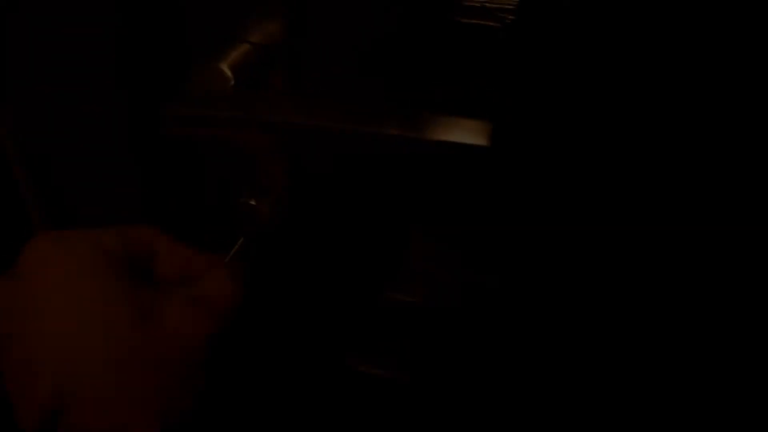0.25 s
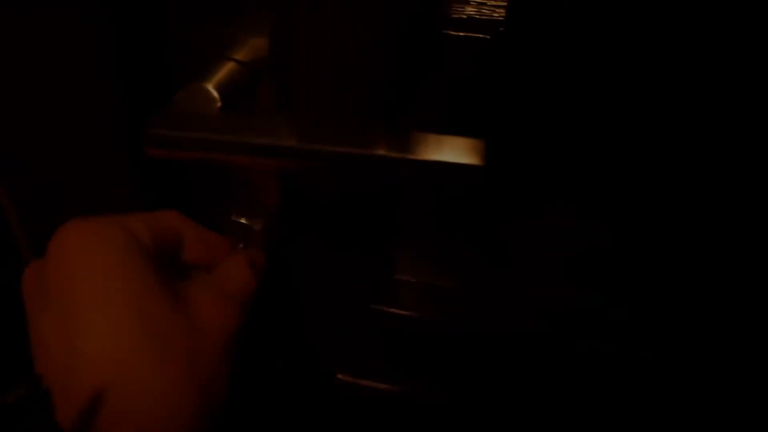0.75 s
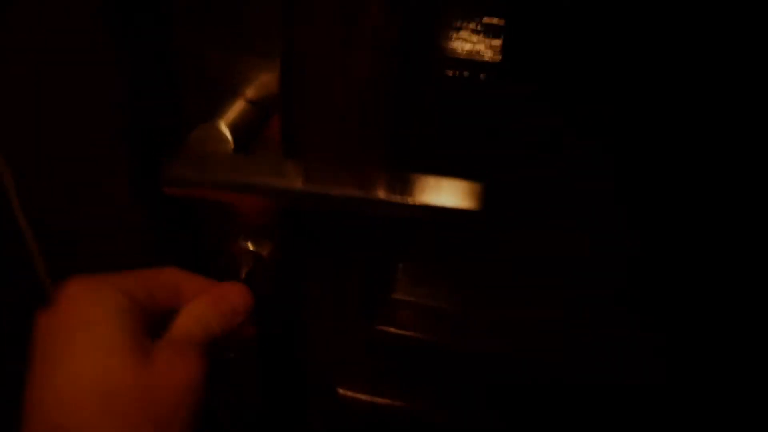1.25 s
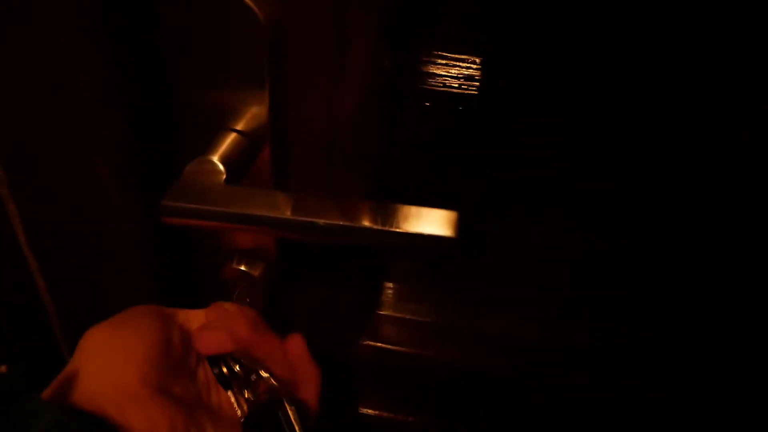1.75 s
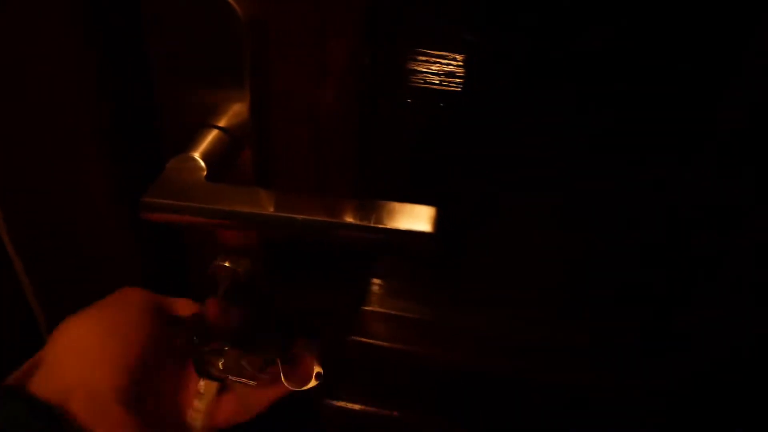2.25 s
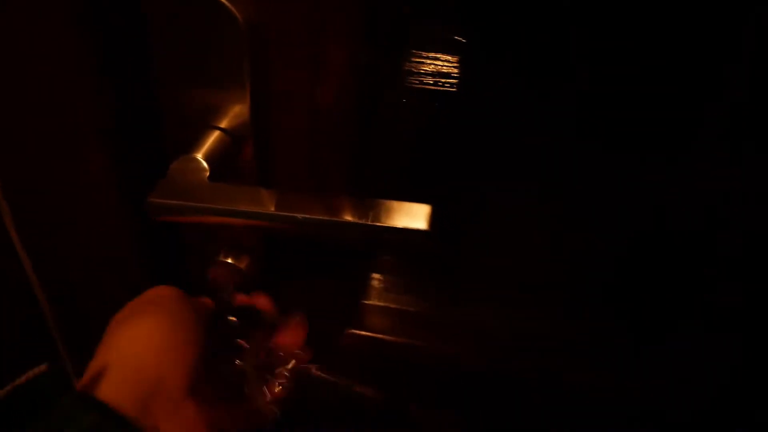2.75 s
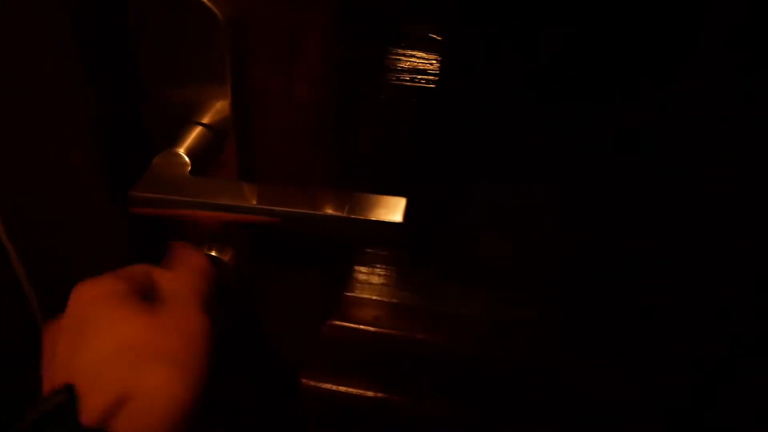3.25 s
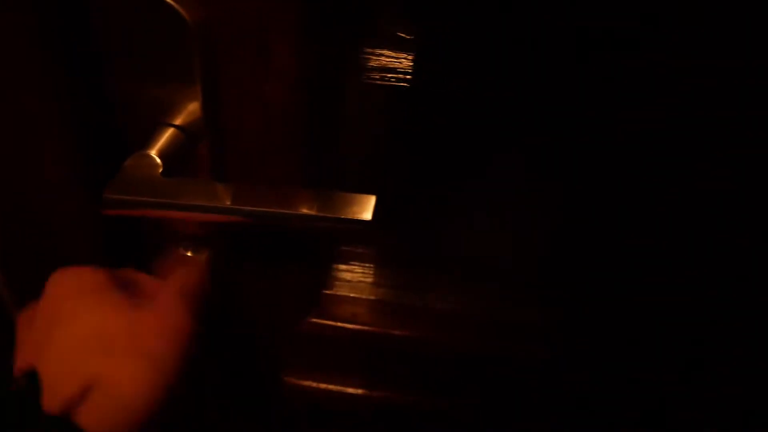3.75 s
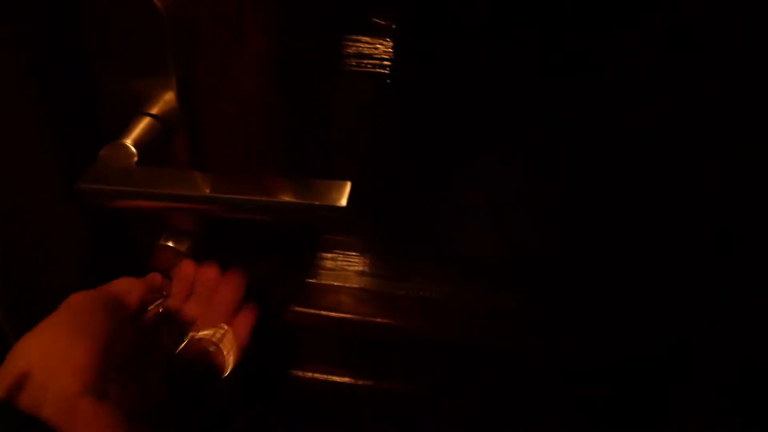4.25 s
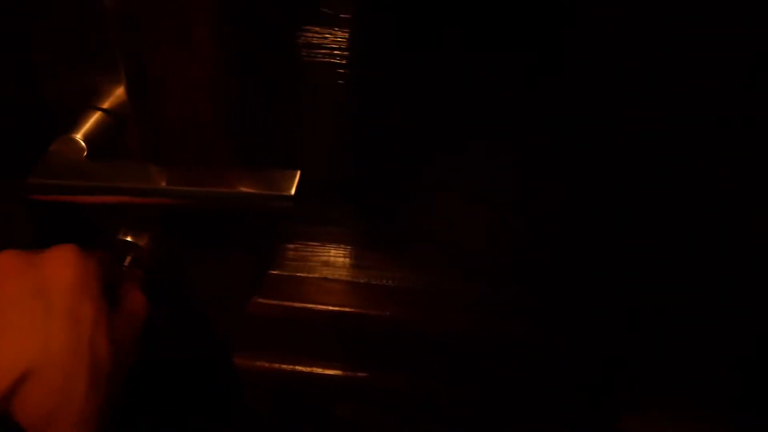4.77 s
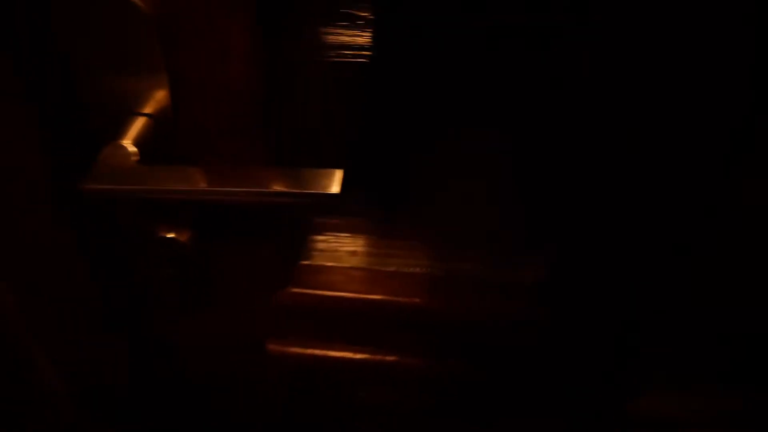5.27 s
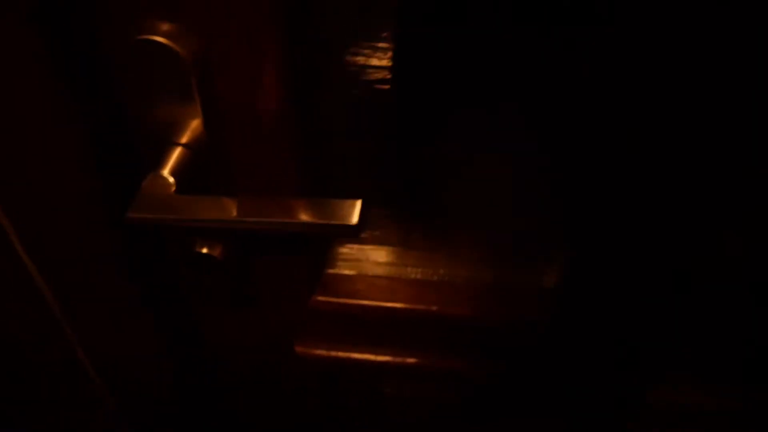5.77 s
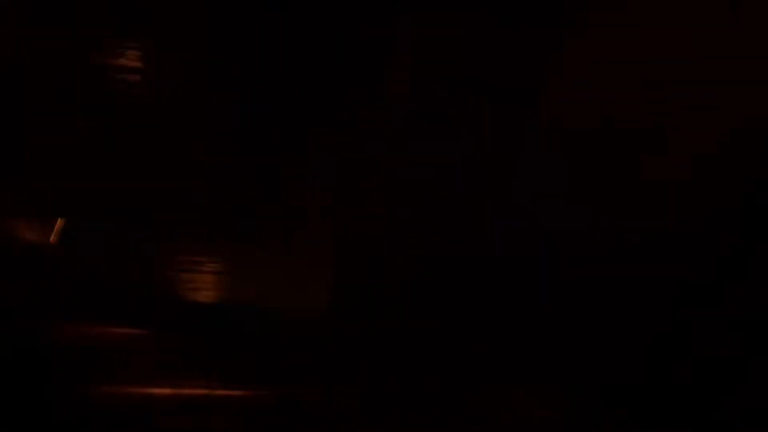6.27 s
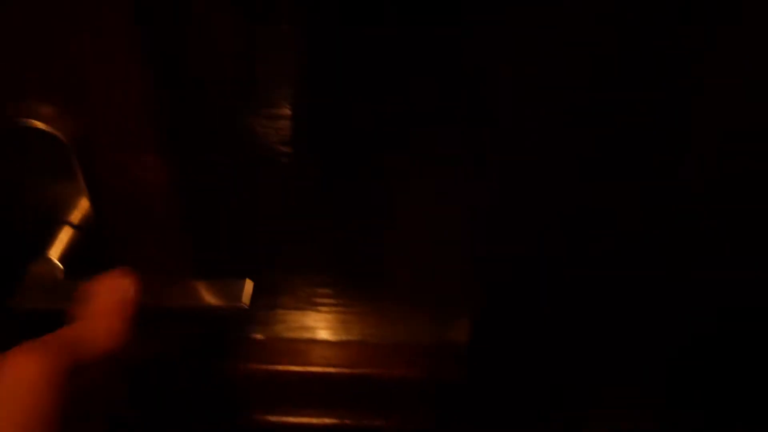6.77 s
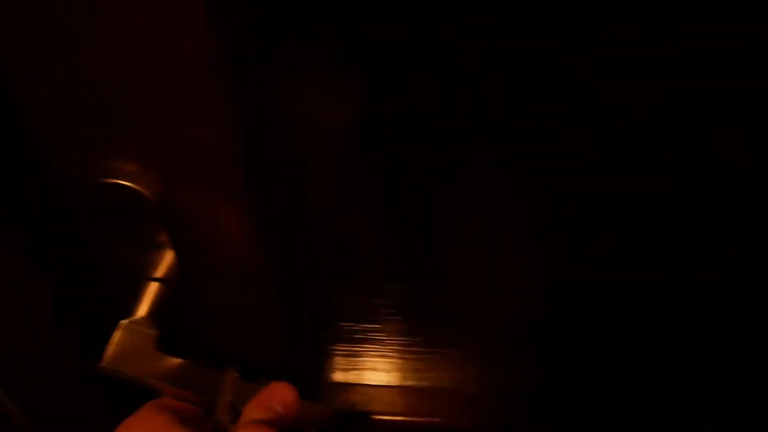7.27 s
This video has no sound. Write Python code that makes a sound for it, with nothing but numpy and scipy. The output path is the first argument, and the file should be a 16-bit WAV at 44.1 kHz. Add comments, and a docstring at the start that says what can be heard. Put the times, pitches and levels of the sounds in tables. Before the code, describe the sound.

Close, dry metallic clicks and scrapes of a key worked in a lock, with jingling keys, bolt knocks and a final lever handle clack.

```python
"""Pins and latch click, a key scrapes in a door lock, loose keys chink and the bolt knocks the wooden door.
Heard close by in a small hallway: a hand works a key on a bunch; near the end keys tap the lever handle.
Clicks and scrape are noise through resonances of the lock; keys, lever, door and case are decaying sines.
Clicks, chinks, taps and knocks also feed sparse hallway reflections; quiet air noise lies beneath."""
import sys
import numpy as np
from scipy import signal
from scipy.fft import rfft, irfft
from scipy.io import wavfile
from scipy.ndimage import uniform_filter1d

SR = 44100
rng = np.random.default_rng(int(sys.argv[2]) if len(sys.argv) > 2 else 0)


def transcribe(signal):
    """Save signal, clipped to [-1, 1], as a 16-bit WAV file at the path in sys.argv[1]."""
    frames = np.atleast_2d(signal).T
    limited = np.clip(frames, -1, 1)
    pcm = np.round(limited * 32767).astype(np.int16)
    wavfile.write(sys.argv[1], SR, pcm)


N = 331632

# Spectrum of the hallway air. Each row: frequency in Hz, relative level in dB.
AIR_SPECTRUM = [(15, -70), (25, 18.5), (848, 10), (2920, 3.5), (3830, -17), (10100, -30), (15500, -12)]
AIR_RMS_DB = -50.5
# Decay of the hallway reflections. Each row: frequency in Hz, t60 in seconds.
HALL_DECAY = [(150, 0.47), (2000, 0.059), (12000, 0.04)]

# Modes of the door panel. Each row: frequency in Hz, relative level in dB, t60 in seconds.
DOOR_MODES = [(105.5, -7.5, 0.08), (136.6, -4, 0.34), (174, -1.5, 0.17), (256.5, 0, 0.24), (328, 7, 0.12),
              (412, 6, 0.11), (504, 1.5, 0.075), (673, 3.5, 0.11), (815, 13.5, 0.047), (997, 14.5, 0.04),
              (1167, 13.5, 0.024)]
# Plates of the lock case. Each row: frequency in Hz, relative level in dB, t60 in seconds.
CASE_MODES = [(1008, 3, 0.048), (1120, -8.5, 0.081), (1714, 0.5, 0.052), (2090, 11, 0.0072),
              (2300, -12, 0.011)]
# Blows that reach the door panel. Each row: start in seconds, peak in dB, pitch region struck in Hz.
DOOR_KNOCKS = [(0.107, -20.5, 910), (0.486, -24.5, 720), (0.971, -31, 940), (1.376, -24, 765),
               (1.662, -20.5, 290), (1.757, -15.5, 590), (1.969, -26.5, 373), (2.245, -19.5, 680),
               (2.653, -7, 547), (2.792, -22, 810), (2.844, -20.5, 645), (2.987, -14, 577),
               (3.29, -15, 646), (3.48, -27, 880), (3.8122, -7.5, 597), (4.048, -21, 660),
               (5.847, -31, 570), (6.71, -28, 267), (7.066, -24, 475), (7.146, -13.5, 493)]
# Soft pushes that shake the whole leaf. Each row: start in seconds, peak in dB, pitch region struck in Hz.
LEAF_PUSHES = [(0.004, -29.5, 174), (0.582, -28, 189), (0.69, -31.5, 141), (0.985, -29, 187),
               (1.665, -29.5, 119), (4.863, -28.5, 100), (5.996, -30.5, 195), (6.96, -33.5, 216),
               (7.158, -23.5, 128)]
# Bolt against lock case. Each row: start in seconds, peak in dB, pitch region struck in Hz.
BOLT_CLANKS = [(1.46, -15, 1740), (3.137, -16.5, 1940), (3.29, -4.5, 2070), (4.641, -18.5, 1170),
               (5.699, -23.5, 1240), (6.6845, -13.5, 966)]
MODE_DETUNE = .015  # spread of mode frequency per blow, as a fraction

# Modes of the lever handle. Each row: frequency in Hz, level in dB, t60 in seconds.
LEVER_MODES = [(3500, -19.5, 0.037), (6050, -2, 0.013), (8200, -12, 0.058), (9630, 1.5, 0.027),
               (10740, 8.5, 0.0043), (14400, 8, 0.0063)]
# A ring of keys taps the lever handle. Each row: start in seconds, level in dB.
KEY_TAPS = [(6.927, -8), (7.497, -30)]

# Modes of the short key. Each row: frequency in Hz, relative level in dB.
SHORT_KEY_MODES = [(8110, -16.5), (10140, -2), (13350, -20)]
# Modes of the long key. Each row: frequency in Hz, relative level in dB.
LONG_KEY_MODES = [(8655, -8), (9990, -2), (14730, -23)]
# Modes of the rest of the bunch. Each row: frequency in Hz, relative level in dB.
SMALL_KEY_MODES = [(7120, -16), (9440, -11), (10300, -11)]
# Loose keys striking. Each row: start in seconds, short key level in dB, long key level in dB,
# seconds until a touch damps them.
KEY_CHINKS = [(0.2465, -18, -35, 0.02), (1.075, -34, -18.5, 0.011), (1.282, -13.5, -15.5, 0.0045),
              (1.313, -21, -38, 0.008), (1.341, -30, -27, 0.0082), (2.0646, -14.5, -23, 0.0035),
              (2.336, -4.5, -15, 0.0082), (2.421, -38, -21.5, 0.073), (2.5097, -21, -20, 0.028),
              (2.607, -17, -33, 0.05), (2.756, -36, -28, 0.04), (2.801, -13, -34, 0.032),
              (2.826, -16, -20, 0.0097), (2.915, -30, -7.5, 0.015), (2.932, -28, -13, 0.016),
              (3.725, -21, -43, 0.076), (3.79, -23, -18, 0.025), (3.869, -24, -24, 0.012),
              (4.116, -35, -16.5, 0.016), (4.156, -10, -35, 0.011), (4.177, -22, -19, 0.01),
              (4.1997, -13, -19, 0.005), (4.215, -17, -10, 0.0045), (4.23, -9.5, -16, 0.01),
              (4.5482, -17, -23, 0.0091)]
KEY_T60_S, TOUCH_T60_S = 0.17, 0.01  # the touch adds its decay to that of the key
SWING_START_S, SWING_END_S = 1, 4.35  # while the bunch swings from the lock

# Lower resonances of lock case and handle. Each row: frequency in Hz, width in Hz, relative level in dB.
LOCK_LOW_MODES = [(1890, 640, -12), (2440, 424, -8), (3008, 328, -7.5), (3228, 262, -6.5),
                  (4120, 1260, -17.5)]
# Upper resonances of lock case and handle. Each row: frequency in Hz, width in Hz, relative level in dB.
LOCK_HIGH_MODES = [(5770, 1100, -14), (6480, 2500, 3), (8480, 1100, 0.5), (9780, 1450, 8)]
LOCK_MODE_COUNT = len(LOCK_LOW_MODES) + len(LOCK_HIGH_MODES)

# Spectrum of the push in the door. Each row: frequency in Hz, relative level in dB.
RUMBLE_SPECTRUM = [(24, -53), (40, -21), (129, -0.5), (329, 0.5), (651, 2.5), (1500, -4), (3300, -120)]
# Strokes of metal on metal. Each row: time of full force in seconds, build-up in seconds, hold in seconds,
# scrape level in dB, rumble level in dB.
KEY_STROKES = [(0.0, .01, 0.0052, -26, -40.5), (0.116, 0.045, 0.052, -41, -47.5),
               (1.18, 0.14, 0.0035, -21, -30), (1.478, 0.032, 0.051, -19.5, -27.5),
               (1.921, 0.067, 0.064, -29, -50), (2.21, 0.16, 0.012, -26, -34.5),
               (2.521, 0.056, 0.057, -23.5, -40), (2.872, 0.13, 0.035, -31, -33.5),
               (3.149, 0.043, 0.18, -30.5, -44.5), (3.498, 0.098, 0.036, -29.5, -41),
               (3.853, 0.26, 0.019, -30.5, -40.5), (3.964, 0.029, 0.034, -30, -43),
               (4.078, 0.17, 0.054, -33, -35.5), (4.227, 0.21, 0.011, -29, -44.5),
               (4.874, 0.0031, 0.048, -26, -35.5), (5.301, 0.42, 0.065, -33.5, -45),
               (5.55, 0.026, 0.16, -28.5, -50), (6.489, 0.95, 0.046, -34.5, -47),
               (7.098, 0.01, 0.072, -32, -37.5), (7.51, 0.17, .02, -37, -46)]
# Light contact of hand and key between strokes. Each row: time in seconds, scrape level in dB,
# rumble level in dB.
LIGHT_CONTACT = [(0, -45, -64), (.44, -44.5, -44.5), (.95, -51, -52.5), (1.35, -35, -44.5),
                 (1.8, -43, -42.5), (2.3, -34, -44), (2.465, -38.5, -53.5), (2.6, -30.5, -44),
                 (2.8, -30, -40.5), (3.099, -45, -48.5), (4.1, -39, -92), (4.45, -43, -39),
                 (4.82, -57, -67), (5.0, -48, -51), (5.47, -47, -53.5), (6.1, -40, -52), (6.64, -48, -52),
                 (6.75, -44, -47), (7.05, -48.5, -51), (7.35, -52, -57)]
BUILD_DB, RELEASE_DB_PER_S = 17, 242  # a stroke swells by this much, then lets go at this rate
SCRAPE_LOW_DB = -6  # share of the lower lock modes

# Clear strikes of pins, bolt and handle parts. Each row: start in seconds, peak before panning in dB,
# share of the lower lock modes in dB.
PART_CLICKS = [(0.075, -17, -10), (0.098, -4.5, -5), (0.135, -20, -20), (0.325, -21.5, -2),
               (0.388, -21, -40), (0.435, -16.5, -7.5), (0.4779, -5.5, -2.5), (0.484, -6, -11),
               (0.5354, -12.5, -2), (0.561, -1.5, -10.5), (0.574, -12, -2), (0.631, -14.5, -2),
               (0.6672, -9, -7.5), (0.829, -21.5, -4.5), (0.966, -17.5, -3.5), (1.018, -17, -13),
               (1.129, -9, -3), (1.185, -7, -3), (1.19, -0.5, -10), (1.373, -18.5, -2.5), (1.445, -8, -1.5),
               (1.5371, -1.5, -7), (1.62, -8, -8), (1.6733, -11, -9), (1.759, 0.5, -6), (1.971, -19, -21),
               (2.0648, -11.5, -30), (2.155, -11.5, -7.5), (2.18, -16, -9), (2.2, -13.5, -3),
               (2.216, -27, -25), (2.288, -19, -26), (2.311, -17, -11), (2.335, -8, -5), (2.348, -5.5, -29),
               (2.482, -10, -7), (2.597, -7.5, -37), (2.617, -8, -25), (2.6512, -3, -5),
               (2.6912, -12.5, 4.5), (2.7882, -11, -2.5), (2.8382, -3, -6), (2.9004, -7, -9.5),
               (2.9801, -9.5, -0.5), (2.989, -1.5, -7.5), (3.1354, -4.5, -35), (3.243, -9.5, -1),
               (3.2498, -14, -7), (3.2894, -2.5, -4), (3.347, -14, -14), (3.7927, -6, -18),
               (3.8123, -3, -7), (4.0438, -7.5, -3), (4.063, -7.5, -14), (4.079, -12, 0.5),
               (4.1736, -11, -17), (4.224, -9.5, -7), (4.2423, -6, -6.5), (4.274, -9, -23),
               (4.282, -14, -3.5), (4.4391, -15.5, 1), (4.4748, -14.5, -17), (4.554, -6, -6),
               (4.6406, -14, -6.5), (4.698, -16, -13), (4.868, -2, -14), (4.893, -7, -28),
               (5.3276, -8, -11), (5.543, -9.5, 1), (5.5673, -9, -5), (5.599, -15, -5), (5.67, -6, -13),
               (5.6765, -12, -18), (5.702, -7.5, -1.5), (5.7518, -14.5, -4), (5.7635, -11.5, -1.5),
               (5.7888, -9, -2), (5.885, -10.5, -24), (5.9154, -10.5, -3), (5.966, -14, -2),
               (6.045, -7.5, -5.5), (6.079, -17, -3), (6.136, -19.5, -0.5), (6.171, -14, -9),
               (6.207, -15, 0.5), (6.375, -19, -10), (6.485, -9.5, -6), (6.495, -15.5, -1),
               (6.6846, -3, -9), (6.733, -14, -3), (6.7532, -11, -0.5), (6.78, -12.5, -1.5),
               (6.8372, -7, -8.5), (6.87, -16, -1), (6.997, -19.5, -2.5), (7.0648, -15, -1),
               (7.0805, 1, -14), (7.084, -4, -15), (7.1418, -0.5, -9.5), (7.385, -24.5, -10),
               (7.499, -9, -20)]
KEY_OUT_S = 5.73
CHATTER_T60_S, FREE_CHATTER_T60_S = 0.072, 0.016  # middle values with the key in the barrel, and out
RUN_UP_S, CRACK_T60_S, CHATTER_DB = .002, .008, -7  # chatter level is relative to the crack
LEFT_START_S, LEFT_END_S = 6.2, 6.9  # while the keys dangle from the hand on the left

NOTCH_HZ, NOTCH_WIDTH_HZ = 7830, 120  # narrow dip of the microphone housing
TREBLE_HZ, EDGE_HZ = 14200, 15900  # soft roll-off, then steep band limit


def gain_of(db):
    """Decibels to an amplitude factor."""
    return 10 ** (np.asarray(db) / 20)


def evened(x):
    """Scales to rms 1 over the whole array."""
    return x / np.sqrt(np.mean(x ** 2) + 1e-20)


def read(points, hz):
    """Interpolates a table on a log-frequency axis."""
    f, value = np.transpose(points)
    return np.interp(np.log(hz + 1), np.log(f + 1), value)


def add(mix, start_s, sound):
    """Mixes a sound in at start_s, cut at the end of the mix."""
    part = mix[..., round(start_s * SR):][..., :sound.shape[-1]]
    part += sound[..., :part.shape[-1]]


def left_right(left_db):
    """Pan gains: left up and right down by left_db."""
    return gain_of([[left_db], [-left_db]])


def coloured(points, same):
    """Stereo noise of rms 1: white spectra shaped by a table, the channels correlated by same."""
    a, b = rfft(rng.standard_normal((2, N)))
    spectra = np.array([a, same * a + np.sqrt(1 - same ** 2) * b])
    shape = gain_of(read(points, np.fft.rfftfreq(N, 1 / SR)))
    return evened(irfft(spectra * shape, N))


def air():
    """Steady shaped noise of the hallway air, almost unrelated left and right."""
    return gain_of(AIR_RMS_DB) * coloured(AIR_SPECTRUM, 0.013)


def hall(x):
    """Sparse reflections of random sign, other ones for each ear, each band dying at its own speed."""
    taps = np.zeros((2, SR // 2))
    slots = np.arange(100, SR // 2 - 20, 20)
    at = slots + rng.integers(0, 20, (2, len(slots)))  # one reflection per 20 samples
    np.put_along_axis(taps, at, rng.choice([-1., 1.], at.shape), 1)
    hz, t, bands = signal.stft(taps, SR, nperseg=256)
    t60 = np.maximum(read(HALL_DECAY, hz), .02)[:, None]
    tail = signal.istft(bands * gain_of(-60 * t / t60), SR, nperseg=256)[1]
    return signal.fftconvolve(x[None], tail / np.linalg.norm(tail[0]), axes=1)[:, :N]


def knocks(blows, modes, rise_cycles, reach_octaves, thump):
    """Struck panel or plates: modes near the struck region ring most, with a short dull thump around it."""
    out, t = np.zeros(N), np.arange(SR // 2) / SR
    hz, mode_db, t60 = np.transpose(modes)[:, :, None]
    chances = rng.standard_normal((len(blows), 2, len(modes), 1))
    for (start_s, peak_db, centre_hz), (height, detune) in zip(blows, chances):
        near_db = -6 * (np.log2(hz / centre_hz) / reach_octaves) ** 2 + 1.96 * height
        phase = 2 * np.pi * hz * (1 + MODE_DETUNE * detune) * t + height
        rings = gain_of(mode_db + near_db - 60 * t / t60) * np.sin(phase)
        shake = evened(uniform_filter1d(rng.standard_normal(rings.shape), 900))
        rings = rings * (1 + 0.25 * shake)  # each mode flutters
        # the thump dies in a few cycles
        push = thump * gain_of(-60 * t * centre_hz / 7.1) * np.sin(2 * np.pi * 1.04 * centre_hz * t)
        sound = (rings.sum(0) + push) * (1 - np.exp(-t * centre_hz / rise_cycles))
        add(out, start_s, gain_of(peak_db) * sound / abs(sound).max())
    return out


def lever():
    """The solid handle rings briefly when tapped: decaying sines with a short rise."""
    out, t = np.zeros(N), np.arange(SR // 8) / SR
    ring = sum(gain_of(db - 60 * t / t60) * np.sin(2 * np.pi * hz * t) for hz, db, t60 in LEVER_MODES)
    ring = ring * np.minimum(t / 0.00038, 1)
    for start_s, db in KEY_TAPS:
        add(out, start_s, gain_of(db) * ring)
    return out * left_right(2.2)


def jingle(scrape_db):
    """Swinging keys keep brushing each other: random touches ring key modes, following the scrape level."""
    t = np.arange(N) / SR
    modes = SHORT_KEY_MODES + LONG_KEY_MODES + SMALL_KEY_MODES
    swinging = (SWING_START_S < t) & (t < SWING_END_S)
    shape = (len(modes), N)
    touches = rng.standard_normal(shape) * (rng.random(shape) < 70 / SR)  # 70 per second and mode
    rings = sum(gain_of(db) * signal.lfilter(*signal.iirpeak(hz, hz / 35, SR), touch * swinging)
                for (hz, db), touch in zip(modes, touches))
    return gain_of(scrape_db - 10) * evened(rings)


def chinks():
    """Two keys ring at their own modes; each blow favours other modes and the loose ring makes them flutter."""
    out, t = np.zeros(N), np.arange(SR // 6) / SR
    hz, mode_db = np.transpose(SHORT_KEY_MODES + LONG_KEY_MODES)
    is_long = np.arange(len(hz)) >= len(SHORT_KEY_MODES)
    chances = rng.standard_normal((len(KEY_CHINKS), len(hz), len(t) + 2))
    for (start_s, short_db, long_db, free_s), chance in zip(KEY_CHINKS, chances):
        key_db = np.where(is_long, long_db, short_db)
        heights = gain_of((mode_db + key_db)[:, None] + 2 * chance[:, :1])
        flutter = 1 + .3 * evened(uniform_filter1d(chance[:, 2:], 130))
        detune = chance[:, 1:2]  # also sets the phase
        cycles = hz[:, None] * (1 + .002 * detune) * t + detune
        rings = heights * flutter * np.sin(2 * np.pi * cycles)
        decay_db = -60 * t / KEY_T60_S - 60 * np.maximum(t - free_s, 0) / TOUCH_T60_S
        add(out, start_s, gain_of(decay_db) * rings.sum(0) * np.minimum(t / .0012, 1))
    return out * left_right(1.6)


def resonate(x, modes, spread_db, sign):
    """Sums two-pole resonances, each driven by its row of spread_db; a negative sign alternates them."""
    return sum(sign ** k * signal.lfilter(*signal.iirpeak(hz, hz / width, SR), x * gain_of(db + spread_db[k]))
               for k, (hz, width, db) in enumerate(modes))


def metal(drive, low_db, spread_db):
    """Resonances of lock case and handle: low_db sets how much of the lower modes is heard."""
    low = resonate(drive, LOCK_LOW_MODES, spread_db, -1.002)
    high = resonate(drive, LOCK_HIGH_MODES, spread_db[len(LOCK_LOW_MODES):], 1)
    share = np.clip(gain_of(low_db), 0, .98)
    return share * evened(low) + np.sqrt(1 - share ** 2) * evened(high)


def force(t):
    """Scrape and rumble levels in dB: the strongest stroke under way, or else the light contact."""
    contact_s, *resting = np.transpose(LIGHT_CONTACT)
    top_s, build_s, hold_s, *levels = np.transpose(KEY_STROKES)[:, :, None]
    build_db = BUILD_DB * np.maximum(top_s - t, 0) / np.maximum(build_s, .005)
    below_db = build_db + RELEASE_DB_PER_S * np.maximum(t - top_s - hold_s, 0)
    return [np.maximum((db - below_db).max(0), np.interp(t, contact_s, rest))
            for db, rest in zip(levels, resting)]


def bursts(shape, db_scale, per_s, decay_s):
    """Sparse impulses of random height, bare and with exponential tails."""
    heights = gain_of(db_scale * np.minimum(rng.exponential(1, shape), 3))
    impulses = heights * (rng.random(shape) < per_s / SR)
    return impulses, signal.lfilter([1], [1, -np.exp(-1 / (decay_s * SR))], impulses)


def hand():
    """Tiny slips over a rubbing hiss wander from mode to mode; the push rumbles in the door, keys jingle."""
    scrape_db, rumble_db = force(np.arange(N) / SR)
    wander = rng.standard_normal((LOCK_MODE_COUNT + 1, N // 100 + 1))  # last row is for the rumble
    wander = np.repeat(evened(uniform_filter1d(wander, 7)), 100, axis=1)[:, :N]
    slips, tails = bursts(N, 3, 400, 0.003)
    _, ticks = bursts(wander.shape, 4, 70, 0.005)  # burrs snap past each other, each ringing one mode
    a, b = rng.standard_normal((2, N)) * (1 + 1.3 * evened(tails))
    a = a + .7 * evened(slips)  # every slip starts with a crisp tick
    wander_db = 1.9 * wander + 20 * np.log10(1 + .75 * evened(ticks))
    scrape = metal(np.array([a + 0.32 * b, a - 0.51 * b]), SCRAPE_LOW_DB, wander_db)
    rumble = evened(coloured(RUMBLE_SPECTRUM, 0.53) * gain_of(2.93 * wander[-1]))
    scrape = gain_of(scrape_db) * left_right(.8) * scrape
    return scrape + jingle(scrape_db) + gain_of(rumble_db) * rumble


def clicks():
    """A short run-up, a sharp crack and a softer chatter of the struck part; each blow favours other modes."""
    out, t = np.zeros((2, N)), np.arange(SR // 10) / SR
    after_s = np.maximum(t - RUN_UP_S, 0)
    chances = rng.standard_normal((len(PART_CLICKS), 2 * len(t) + LOCK_MODE_COUNT))
    for (start_s, peak_db, low_db), chance in zip(PART_CLICKS, chances):
        if start_s < KEY_OUT_S:
            t60, spike, mode_spread_db = CHATTER_T60_S, 4, 3
        else:
            t60, spike, mode_spread_db = FREE_CHATTER_T60_S, 9, 2
        t60 = t60 * gain_of(2.2 * chance[0])  # some parts settle sooner
        both, apart = chance[:2 * len(t)].reshape(2, -1)
        noise = (both + [[.25], [-.25]] * apart) * np.where(t < RUN_UP_S, 0.62 * t / RUN_UP_S, 1)
        crack = gain_of(-60 * after_s / CRACK_T60_S)
        chatter = gain_of(CHATTER_DB - 60 * after_s / t60)
        drive = noise * (crack + chatter)
        drive[:, round(RUN_UP_S * SR)] += spike
        spread_db = mode_spread_db * chance[2 * len(t):]
        spread_db -= max(low_db, 0) * np.arange(len(spread_db))  # low share above 0 dB: higher modes fall off
        click = metal(drive, low_db, spread_db)
        pan_db = 6 if LEFT_START_S < start_s < LEFT_END_S else 2.8
        add(out, start_s, gain_of(peak_db) * click / abs(click).max() * left_right(pan_db / 2))
    return out


def scene():
    """Hits with their reflections, plus the hand's scraping, over the quiet air of the hallway."""
    door = knocks(DOOR_KNOCKS, DOOR_MODES, 0.66, 1.2, 25)
    door = door + knocks(LEAF_PUSHES, DOOR_MODES, 0.3, 0.4, 0.37)
    door = door + knocks(BOLT_CLANKS, CASE_MODES, 0.9, 0.25, 5.3)
    metal_hits = lever() + chinks() + clicks()
    echoes = hall(gain_of(-5.0) * metal_hits.mean(0) + gain_of(-14.0) * door)
    return air() + echoes + door + hand() + metal_hits


def record(dry):
    """Microphone: rolls off deep bass and top, one narrow dip; hard limit at full scale, then band limit."""
    thin = signal.lfilter(*signal.butter(1, 60, "high", fs=SR), dry)
    thin = signal.lfilter(*signal.iirnotch(NOTCH_HZ, NOTCH_HZ / NOTCH_WIDTH_HZ, SR), thin)
    thin = signal.lfilter(*signal.butter(2, TREBLE_HZ, fs=SR), thin)
    edge = signal.firwin(255, EDGE_HZ, window=("kaiser", 9), fs=SR)
    return signal.oaconvolve(np.clip(thin, -1, 1), edge[None], "same")


dry = scene()
out = record(dry)
transcribe(out)
```